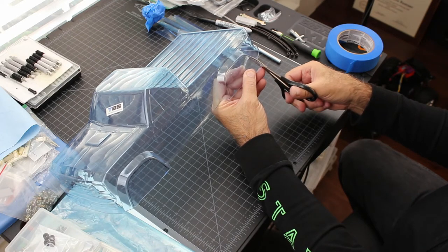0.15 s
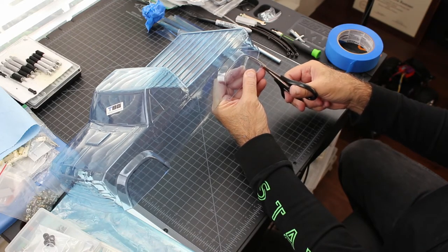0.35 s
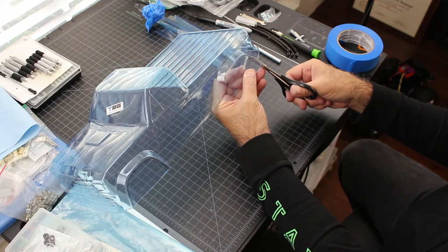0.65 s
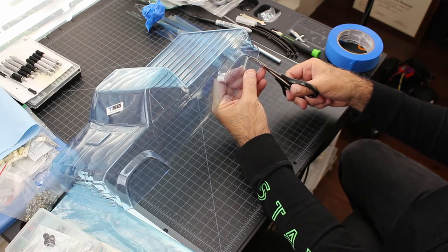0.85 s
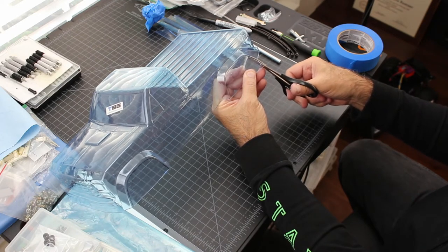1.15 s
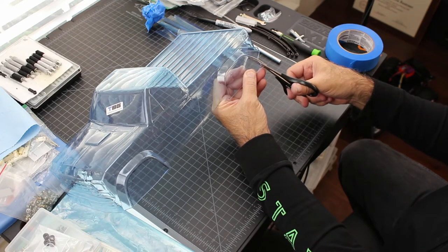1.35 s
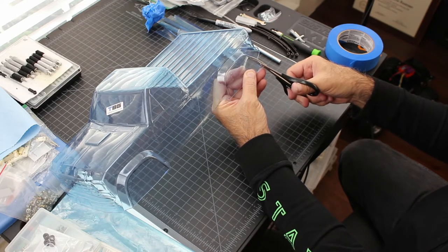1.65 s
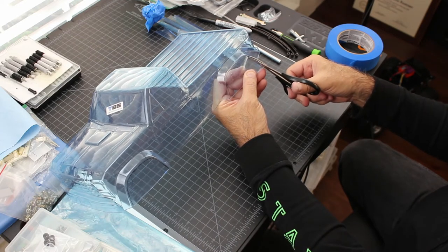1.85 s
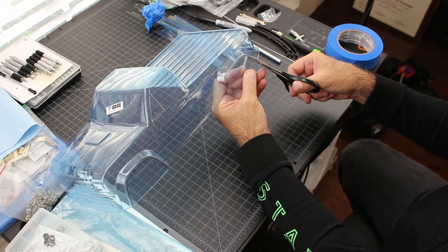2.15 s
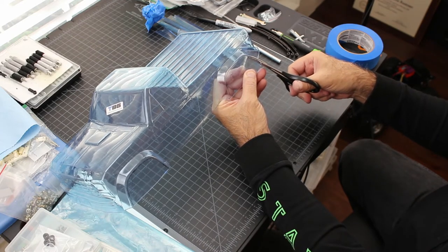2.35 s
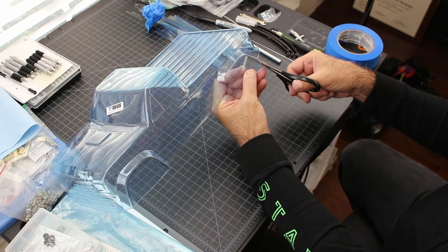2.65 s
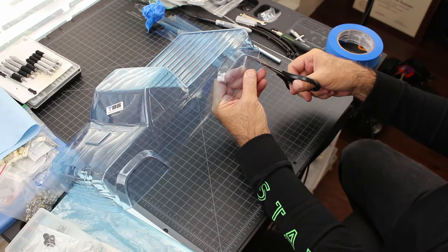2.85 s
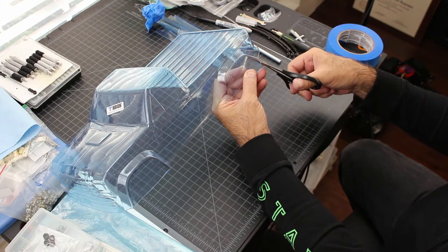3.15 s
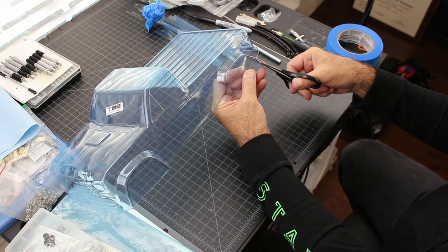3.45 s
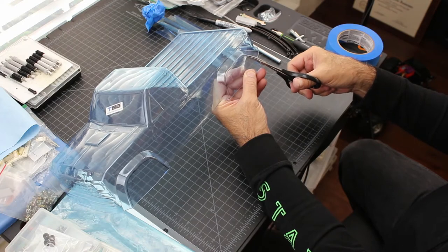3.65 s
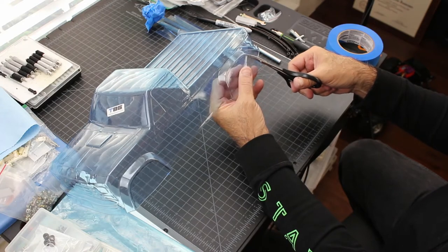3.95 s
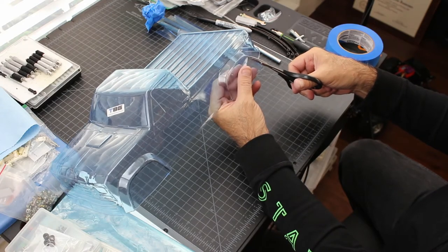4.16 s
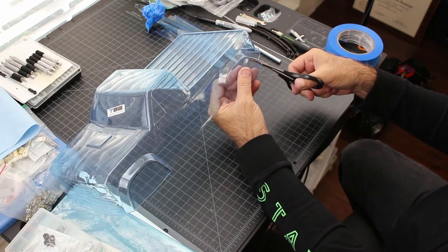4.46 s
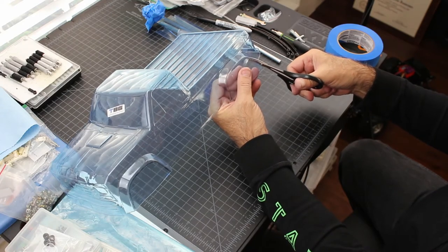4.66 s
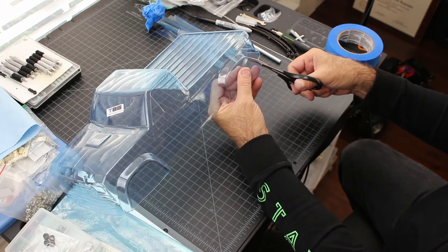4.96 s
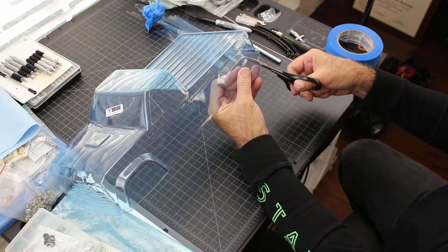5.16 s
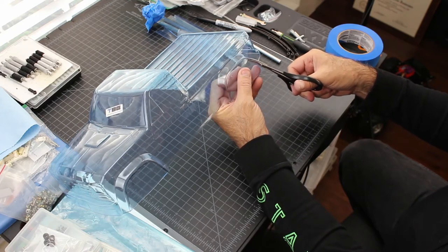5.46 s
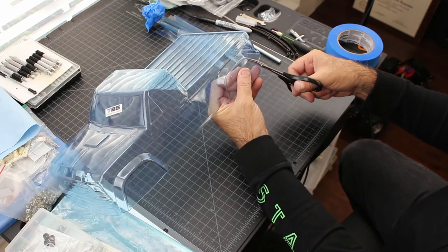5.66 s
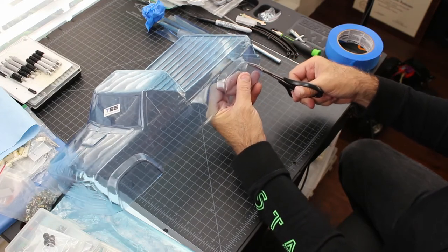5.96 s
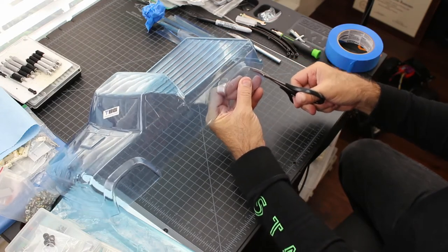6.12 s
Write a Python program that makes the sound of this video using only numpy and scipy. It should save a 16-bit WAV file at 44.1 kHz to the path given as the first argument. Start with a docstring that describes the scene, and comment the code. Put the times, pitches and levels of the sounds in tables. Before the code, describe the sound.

Curved scissors snip slowly through a thin plastic shell in a quiet workshop, with hollow snaps, steel clicks and a loud buckle at the end.

```python
"""Soft hollow knocks and a tick of steel, then curved scissors nibble along a thin plastic shell,
held by hand over a workbench. In each stroke the blades slip, rasp and judder until the plastic
snaps; every snap or flex is an impulse that rings the bending modes of the whole moulded shell.
Near the end it buckles loudly in the grip. A small, quiet workshop with a faint hum lies behind."""
import sys
import numpy as np
from scipy import signal
from scipy.fft import rfft, irfft, next_fast_len
from scipy.io import wavfile
from scipy.ndimage import uniform_filter1d

SR = 44100
rng = np.random.default_rng(int(sys.argv[2]) if len(sys.argv) > 2 else 0)


def store_pcm(level_fs):
    """Save levels as 16-bit WAV."""
    pcm = np.round(np.clip(level_fs, -1, 1) * 32767).astype(np.int16)
    wavfile.write(sys.argv[1], SR, np.atleast_2d(pcm).T)


N = 277389


def amp(db):
    """Amplitude ratio of a level in decibels."""
    return 10 ** (np.asarray(db) / 20)


def unit_rms(x):
    """Normalisation to a mean power of one."""
    return x / np.sqrt(np.mean(x ** 2) + 1e-20)


def curve(points, hz):
    """Interpolation of (frequency [Hz], value) points on a logarithmic frequency axis."""
    frequencies, values = np.transpose(points)
    return np.interp(np.log(hz + 1), np.log(frequencies + 1), values)


def filtered(x, gain):
    """Linear filtering: the spectrum is multiplied by a gain that depends on frequency."""
    size = next_fast_len(x.shape[-1] + 1024)
    spectrum = rfft(x, size) * gain(np.fft.rfftfreq(size, 1 / SR))
    return irfft(spectrum, size)[..., :x.shape[-1]]


def add(mix, s, sound):
    """Superposition: a sound joins the mix at s seconds."""
    part = mix[..., max(round(s * SR), 0):][..., :sound.shape[-1]]
    part += sound[..., :part.shape[-1]]


def noise_bands(centres, size):
    """Random-phase noise in overlapping bands, rolled off below the lowest centre frequency."""
    hz = np.fft.rfftfreq(size, 1 / SR)
    masks = np.sqrt([curve(list(zip(centres, pick)), hz) for pick in np.eye(len(centres))])
    phases = np.exp(2j * np.pi * rng.random(masks.shape))
    return irfft(masks * hz / (hz + centres[0] / 2) * phases, size)


# spectrum of the room's still air: (frequency [Hz], relative spectral density [dB])
AIR_SPECTRUM = [(12, -38), (20, -5.5), (113, -14.5), (233, -7), (292, -4), (335, -12.5), (386, -8),
                (524, -6), (637, -13), (693, -10.5), (1110, -17.5), (1690, -20), (2650, -27), (14100, -31),
                (15800, -32)]
# stereo width of the air: (frequency [Hz], side-to-mid ratio [dB])
AIR_WIDTH = [(60, -13.5), (120, -14.5), (240, -25), (480, -29), (950, -18.5), (1890, -11.5), (3770, -2.5),
             (7520, -2), (15000, -0.5)]
# partials of the steady hum: (frequency [Hz], level [dB])
HUM_PARTIALS = [(59.2, -71), (269.2, -77.5), (387.6, -57.5), (463, -63), (1184, -74), (1712, -73)]


def room_tone(air_db=-49, flutter_db=-1.5):
    """Ambient noise and hum: the rumble is nearly coherent between the ears, the hiss much less so."""
    mid = filtered(rng.standard_normal(N), lambda hz: amp(curve(AIR_SPECTRUM, hz)))
    side = filtered(rng.standard_normal(N),
                    lambda hz: amp(curve(AIR_SPECTRUM, hz) + curve(AIR_WIDTH, hz)))
    gain = amp(air_db) / mid.std()
    low = filtered(mid, lambda hz: 1 / (1 + (hz / 1800) ** 4))
    flutter = unit_rms(filtered(rng.standard_normal(N), lambda hz: np.exp(-(hz / 8) ** 2)))
    mid = mid + low * (amp(flutter_db * flutter) - 1)  # the lower band wavers in level
    t = np.arange(N) / SR
    hum = sum(np.sqrt(2) * amp(db) * np.sin(2 * np.pi * (hz * t + rng.random()))
              for hz, db in HUM_PARTIALS)
    return gain * np.array([mid + side, mid - side]) + hum


# reverberant field of the workshop: (frequency [Hz], band level [dB], decay time T60 [s])
ROOM_BANDS = [(143, -4.5, 0.82), (426, -7.5, 0.89), (1140, -5, 0.87), (2750, -6.5, 0.98), (7050, -13, 0.54),
              (14000, -12, .18)]


def reverberation(x, build_s=0.0052):
    """Convolution with a diffuse tail that builds up as wall echoes multiply, then dies away."""
    hz, db, t60 = np.transpose(ROOM_BANDS)
    t = np.arange(SR * 3 // 4) / SR
    envelopes = amp(-60 * t / t60[:, None]) * (1 - np.exp(-(t / build_s) ** 2))
    envelopes /= np.linalg.norm(envelopes, axis=1)[:, None]
    tail = amp(db) @ (noise_bands(hz, len(t)) * envelopes) * np.sqrt(len(t))
    return signal.fftconvolve(x, tail)[:N]


# the plastic slides in the grip: (time [s], duration [s], level [dB])
GRIP_SLIDES = [(5.204, 0.19, -63), (5.72, 0.56, -58.5)]


def grip_friction(ramp_share=0.31):
    """Sliding friction: a soft hiss swells and fades as the plastic shifts in the hand."""
    spectrum = [(800, 0), (3000, 7), (7000, 7.5), (15000, 2)]
    hiss = filtered(rng.standard_normal(N), lambda hz: amp(curve(spectrum, hz)))
    envelope = np.zeros(N)
    for s, length, db in GRIP_SLIDES:
        add(envelope, s, amp(db) * signal.windows.tukey(int(length * SR), ramp_share))
    return unit_rms(hiss) * envelope


def dense_modes(table, colour_db, size):
    """Modal overlap: unresolved modes merge into bands of noise, each with its own decay rate."""
    hz, db, t60 = np.transpose(table)
    decay = amp(-60 * np.arange(size) / SR / t60[:, None])
    rings = noise_bands(hz, size) * decay
    rings *= np.sqrt((decay ** 2).sum(1) / (rings ** 2).sum(1))[:, None]
    return amp(db + colour_db(hz)) @ rings


def resolved_modes(table, colour_db, size):
    """Free vibration: damped sinusoids, whose random phases stand for a chance point of impact."""
    hz, db, t60 = np.transpose(table)
    t = np.arange(size) / SR
    cycles = hz[:, None] * t + rng.random((len(hz), 1))
    rings = np.sin(2 * np.pi * cycles) * amp(-60 * t / t60[:, None])
    return amp(db + colour_db(hz)) @ rings * np.sqrt(2) / np.linalg.norm(amp(db))


# bending modes of the shell: (frequency [Hz], relative level [dB], decay time T60 [s])
SHELL_MODES = [(56, -23, 0.98), (122.5, -10, 0.45), (141.5, -26, 1), (242.5, -10, 0.72), (263.6, -6.5, 0.2),
               (307.5, 0.5, 0.15), (334.7, -6, 0.39), (420.8, 3.5, 0.15), (436, -4.5, 0.35),
               (463, 3.5, 0.19), (504, 1, 0.22), (528.7, -5.5, 0.48), (616.8, -0.5, 0.27), (842, -10, 0.64),
               (836, -3, 0.17), (914, -5.5, 0.43), (1110, -13, 0.3), (1154, -23.5, 0.53),
               (1211, -8.5, 0.29), (1326, -2.5, 0.13), (1323, -5, 0.05), (1610, -37, 1), (1511, -14, 0.22),
               (1630, -48, 0.1), (2210, -10, 0.11), (2574, -42, 0.63)]
# the weaker modes between them: (frequency [Hz], relative band level [dB], decay time T60 [s])
SHELL_BANDS = [(62.5, -20, 0.26), (120, -23, 0.21), (243, -5.5, 0.24), (435, -10.5, 0.55), (654, -10, 0.64),
               (974, -11.5, 0.41), (1430, -4.5, 0.11), (1910, -17, 0.24), (3060, -23.5, 0.098),
               (6060, -29, .18)]


def shell(blows, modes_db=-3, bands_db=-6, rise_s=0.0026, lift_width_hz=28, swing_db=-2, swing_s=0.0034):
    """Modal excitation: a push moves large panels, a crack small ones; the spot hit favours one mode."""
    out, t = np.zeros(N), np.arange(SR // 2) / SR
    for s, db, bass_db, treble_db, mode_hz, lift_db in blows:
        spectrum = [(300, bass_db), (450, 0), (620, 0),
                    (1200, treble_db), (2400, treble_db), (5000, treble_db - 2)]
        colour = lambda hz: curve(spectrum, hz)
        favoured = lambda hz: colour(hz) + lift_db / (1 + ((hz - mode_hz) / lift_width_hz) ** 2)
        ring = amp(modes_db) * resolved_modes(SHELL_MODES, favoured, len(t))
        ring += amp(bands_db) * dense_modes(SHELL_BANDS, colour, len(t))
        # a crack lets go at once, a dull flex builds over a few cycles
        attack = 1 - np.exp(-(t * amp(treble_db) / rise_s) ** 2)
        # the struck panel swings hardest until its motion has spread through the shell
        swing = 1 + amp(swing_db) * np.exp(-t / swing_s)
        add(out, s, amp(db) * ring * attack * swing)
    return out


def judders(shakes, overtone_db=-22, waver_share=0.012):
    """Stick-slip oscillation locks on to a panel mode and wavers slightly in pitch."""
    out = np.zeros(N)
    for s, length, hz, db in shakes:
        drift = unit_rms(uniform_filter1d(rng.standard_normal(SR // 4), SR // 100))[:int(length * SR)]
        phase = 2 * np.pi * np.cumsum(hz * (1 + waver_share * drift)) / SR
        tone = np.sin(phase) + amp(overtone_db) * np.sin(2 * phase)
        add(out, s, amp(db) * unit_rms(tone) * signal.windows.tukey(len(tone), .5))
    return out


# spectrum of a blade contact: (frequency [Hz], relative band level [dB], decay time T60 [s])
CONTACT_BANDS = [(1290, -18.5, 0.25), (2500, -12, 0.019), (4000, -16.5, 0.06), (6260, -11, 0.04),
                 (10300, -10, 0.029), (14200, -4.5, 0.011)]


def blade_ticks(clicks, lift_db=6.5, steel_width_hz=1800, onset_s=0.00033, gain_db=-2):
    """Hard impact: a sharp transient takes on one broad resonance of the hand-damped steel."""
    out, t = np.zeros(N), np.arange(SR // 10) / SR
    for s, db, tilt_db, steel_hz in clicks:
        contact = dense_modes(CONTACT_BANDS, lambda hz: tilt_db * np.log2(hz / 7000), len(t))
        contact *= 1 + np.exp(-t / onset_s)
        steel = signal.lfilter(*signal.iirpeak(steel_hz, steel_hz / steel_width_hz, fs=SR), contact)
        add(out, s, amp(db + gain_db) * (contact + (amp(lift_db) - 1) * steel))
    return out


def shearing(rasps, tears_per_s=4000, spread_db=3, low_hz=1200, top_hz=13000):
    """Shot noise: the advancing cut is a random train of tiny tears of uneven size."""
    out, size = np.zeros(N), SR // 8
    passband = lambda hz: hz ** 2 / (hz ** 2 + low_hz ** 2) / (1 + (hz / top_hz) ** 8)
    for s, length, db, tilt_db in rasps:
        strengths = amp(spread_db * np.minimum(rng.exponential(1, size), 4))
        tears = (rng.random(size) < tears_per_s / SR) * rng.choice([-1, 1], size) * strengths
        colour = lambda hz: amp(tilt_db * np.log2(1 + hz / 2500)) * passband(hz)
        rasp = filtered(tears, colour)[:int(length * SR)]
        add(out, s, amp(db) * unit_rms(rasp) * signal.windows.tukey(len(rasp), .4))
    return out


PANEL_LIFT_DB = 12  # emphasis on the mode of a touched or flexing panel


def fidgeting(count=12, knock_db=-47.5, mode_hz=500, tick_db=-52, tilt_db=5, steel_hz=12300):
    """Light impacts: restless hands touch blade to shell at chance moments, exciting both."""
    times = (np.arange(count) + rng.random(count)) * N / SR / count
    touches = list(zip(times, rng.uniform(-6, 0, count)))  # (time [s], relative level [dB])
    knocks = shell([(s, knock_db + db, 0, 0, mode_hz, PANEL_LIFT_DB) for s, db in touches])
    ticks = blade_ticks([(s, tick_db + db, tilt_db, steel_hz) for s, db in touches])
    return np.array([knocks, ticks])


# hollow knocks of the flexing shell:
# (time [s], level [dB], bass of the push [dB], treble of the crack [dB], panel mode [Hz])
PANEL_FLEXES = [(.033, -44, -1, 4, 952), (.146, -37, 1.5, -4, 466), (0.441, -40, 6.5, 6.5, 475),
                (.57, -44, 4, -1, 500), (1.112, -45.5, -5, -1, 488), (1.169, -43, 5, 7, 480),
                (1.554, -32.5, 3.5, -10, 494), (2.334, -34, 3, -3.5, 510), (3.146, -48.5, 8, -1, 487),
                (3.675, -29, 9.5, 0.5, 414), (4.032, -37, 6, 0, 415), (4.255, -43.5, 5.5, 4, 516),
                (4.746, -38, 2, -3.5, 510), (5.593, -48, 3, 1, 496), (5.908, -44, -9, -3, 505),
                (6.011, -29.5, 11, -10, 470), (6.063, -21, 5, -5.5, 310), (6.087, -14, 0.5, -9, 308),
                (6.131, -17.5, 7, -1.5, 1504), (6.18, -20, 6, -3, 824)]
# the blades touch each other and the cut edge:
# (time [s], level [dB], spectral tilt [dB/octave], steel resonance [Hz])
BLADE_CONTACTS = [(.144, -36, -2.5, 12500), (.439, -41, -2.5, 12500), (.555, -41, 1, 12000),
                  (1.112, -46.5, 0, 11000), (2.13, -41.5, 0, 12600), (2.538, -39, 4, 12700),
                  (2.767, -48, 8, 11300), (2.845, -47, 4, 12500), (3.147, -40.5, -4, 4040),
                  (3.5875, -20, 4, 10700), (3.872, -22.5, -6.5, 9800), (4.03, -32.5, -6, 10300),
                  (4.768, -40.5, -3, 10900), (5.255, -40, 1.5, 9100), (6.119, -35, 2, 11000)]


def handling(judder_hz=493, judder_s=0.0355, judder_db=-6.5):
    """Transient excitation: each flex rings and judders the shell; blades tick and the grip slides."""
    knocks = shell([(*flex, PANEL_LIFT_DB) for flex in PANEL_FLEXES])
    shudder = judders([(s, judder_s, judder_hz, db + judder_db) for s, db, *_ in PANEL_FLEXES])
    return np.array([knocks + shudder, blade_ticks(BLADE_CONTACTS) + grip_friction()])


# load on the shell as the grip turns it: (time [s], relative force [dB])
BUCKLING_FORCE = [(6.056, -20), (6.066, -31), (6.1, -14.5), (6.126, -22), (6.136, -15), (6.28, -35.5)]


def buckling(count=7, pop_db=-5, bass_db=1, treble_db=-3, mode_hz=465, lift_db=7,
             groan_hz=493, groan_db=-2, scrape_db=-29, scrape_s=.12, scrape_tilt_db=-5):
    """Elastic instability: one force drives small pops, the panel's groan and a scrape on the blades."""
    at, force_db = np.transpose(BUCKLING_FORCE)
    start, length = at[0], at[-1] - at[0]
    force = amp(np.interp(np.arange(N) / SR, at, force_db))
    times = start + length * (np.arange(count) + rng.random(count) / 2) / count
    pops = shell([(s, np.interp(s, at, force_db) + pop_db, bass_db, treble_db, mode_hz, lift_db)
                  for s in times])
    groan = judders([(start, length, groan_hz, groan_db)])
    scrape = shearing([(start, scrape_s, scrape_db, scrape_tilt_db)])
    return np.array([pops + force * groan, force * scrape])


# three slips of the blade in a stroke, each on a smaller, higher panel: (position [share of stroke],
# level re bite [dB], extra bass [dB], extra treble [dB], panel mode [Hz], its lift [dB])
BLADE_SLIPS = [(0, -6, 5.5, 1, 312, 12.5), (0.299, -1, -7, 3, 427, 11.5), (0.702, 1.5, 0, 2.5, 614, 5)]
# scissor strokes: (time [s], duration [s], bite [dB], shear [dB], shear tilt [dB/octave], judder [dB],
# snap [dB], click [dB], bass of the push [dB], treble of the crack [dB], mode nearest the blades [Hz])
STROKES = [(0.27, 0.056, -35.5, -46.5, -9.5, -28, -23.5, -29.5, -5, 1, 1080),
           (0.957, .05, -40.5, -53.5, -7, -37, -42, -56, -3.5, 0.5, 504),
           (1.757, 0.03, -39.5, -46.5, -8, -60, -27, -41, -6, 3.5, 957),
           (2.539, .0205, -40.5, -51, -4, -40, -25.5, -23, -8.5, 6, 1080),
           (3.379, .027, -18.5, -35, -10.5, -23.5, -16, -50, -1.5, 0, 1334),
           (3.865, .024, -20, -33, -4, -21, -16, -21.5, 3.5, 0, 492)]


def cutting(judder_hz=487, snap_lift_db=13.5, squeak_s=0.011, squeak_db=-7.5,
            click_tilt_db=1.5, click_hz=4000, click_lift_db=9.5,
            split_s=0.1, split_db=-44, split_tilt_db=-12):
    """Shear fracture: each stroke slips, rasps and judders through the shell until the plastic snaps."""
    blows, shakes, rasps, clicks = [], [], [], []
    for (s, length, bite_db, shear_db, tilt_db, judder_db,
         snap_db, click_db, push_db, crack_db, mode_hz) in STROKES:
        for share, db, bass_db, treble_db, hz, lift_db in BLADE_SLIPS:
            slip_s = s + share * length
            blows.append((slip_s, bite_db + db, push_db + bass_db, crack_db + treble_db, hz, lift_db))
        rasps.append((s, length, shear_db, tilt_db))
        shakes.append((s, length, judder_hz, judder_db))
        # the plastic gives way, its nearest mode squeaks and the blades meet
        end = s + length
        blows.append((end, snap_db, push_db, crack_db, mode_hz, snap_lift_db))
        shakes.append((end, squeak_s, mode_hz, snap_db + squeak_db))
        clicks.append((end, click_db, click_tilt_db, click_hz))
    rasps.append((end, split_s, split_db, split_tilt_db))  # the split runs on after the last stroke
    plastic = shell(blows) + judders(shakes)
    blades = blade_ticks(clicks, click_lift_db) + shearing(rasps)
    return np.array([plastic, blades])


def scene(bench_s=0.003, bench_db=-8, plastic_wet_db=-4, blades_wet_db=-1):
    """Direct sound, an early reflection and reverberation add up at the centre, over the room tone."""
    plastic, blades = cutting() + handling() + buckling() + fidgeting()
    add(blades, bench_s, amp(bench_db) * blades)  # the bench top reflects the blades
    tail = reverberation(amp(plastic_wet_db) * plastic + amp(blades_wet_db) * blades)
    return plastic + blades + tail + room_tone()


def record(dry, low_cut_hz=36, high_cut_hz=15900):
    """Band limiting: the microphone's low cut, followed by a steep low-pass filter."""
    thinned = signal.sosfilt(signal.butter(2, low_cut_hz, "high", fs=SR, output="sos"), dry)
    low_pass = signal.firwin(511, high_cut_hz, window=("kaiser", 9), fs=SR)
    return signal.oaconvolve(thinned, low_pass[None], "same")


dry = scene()
out = record(dry)
store_pcm(out)
```